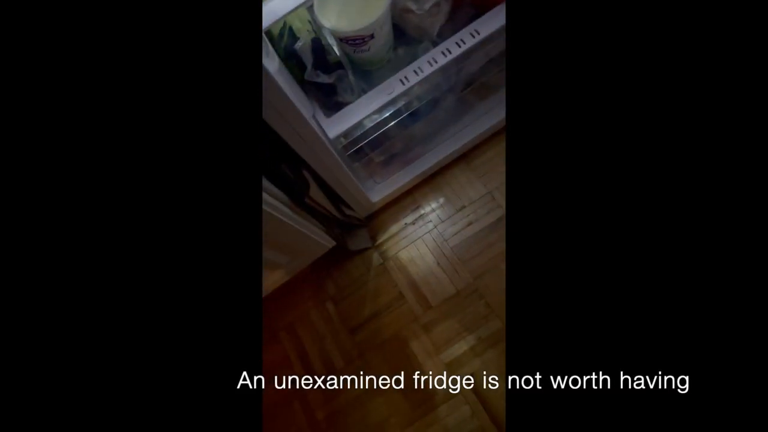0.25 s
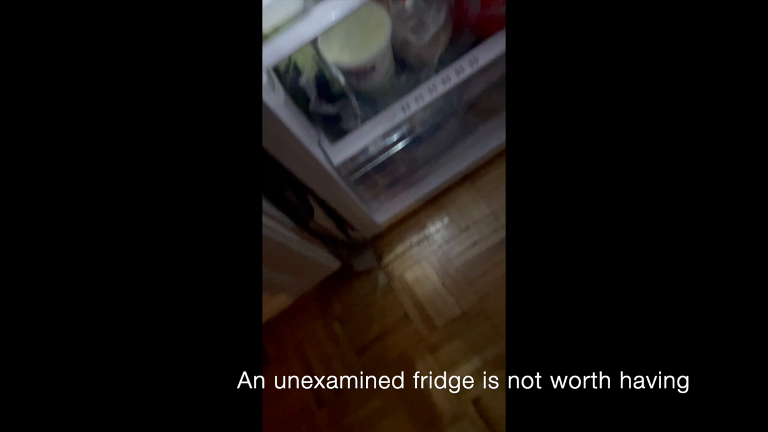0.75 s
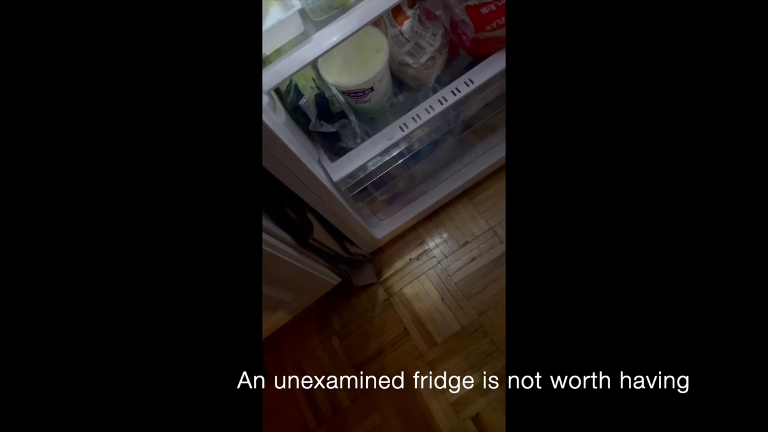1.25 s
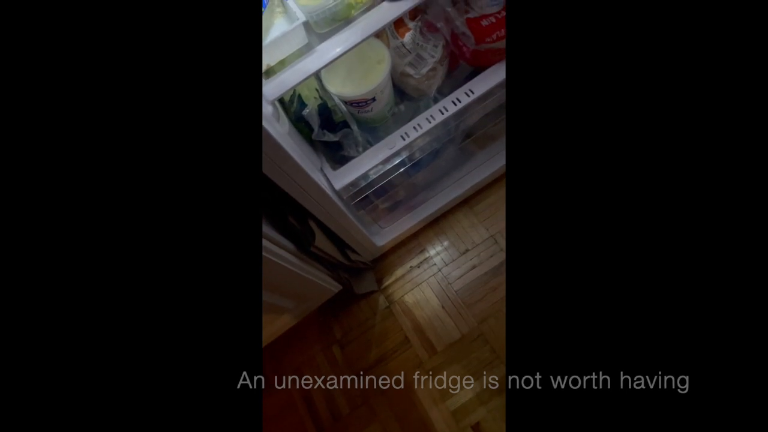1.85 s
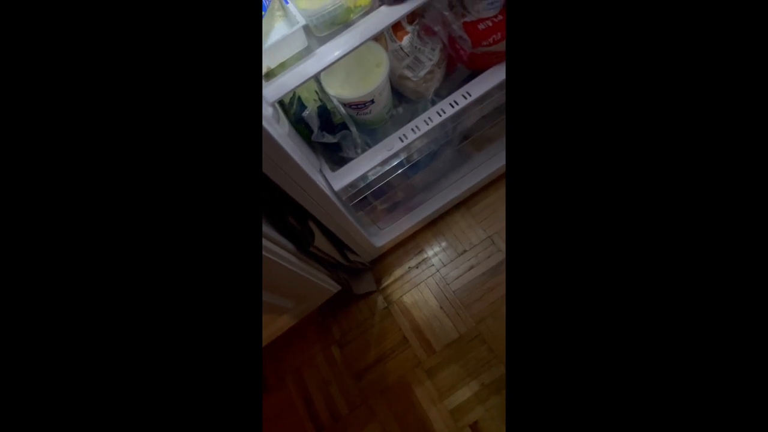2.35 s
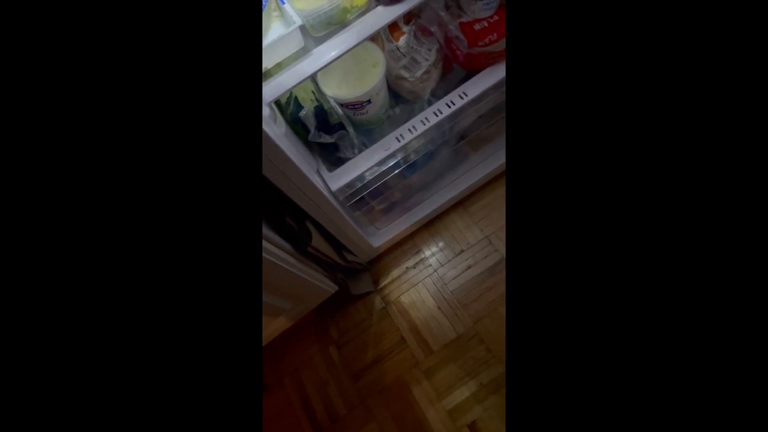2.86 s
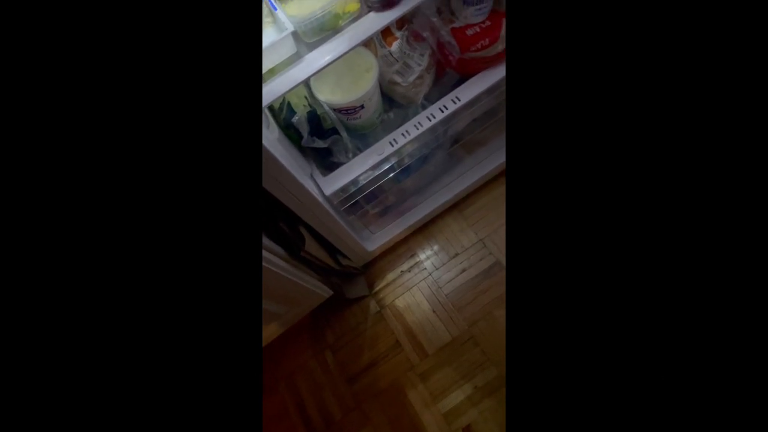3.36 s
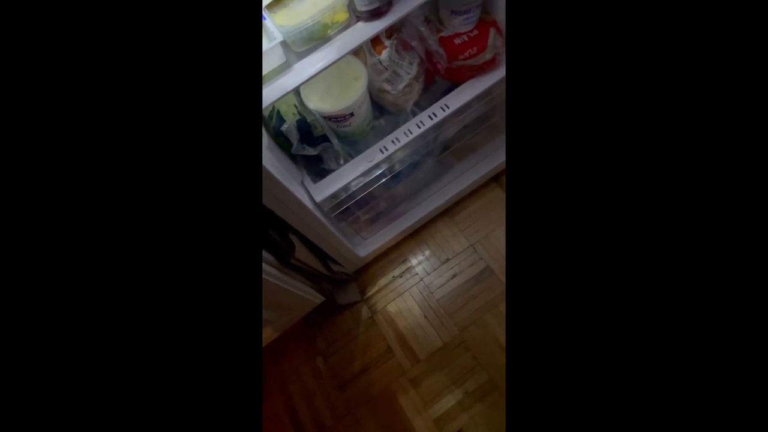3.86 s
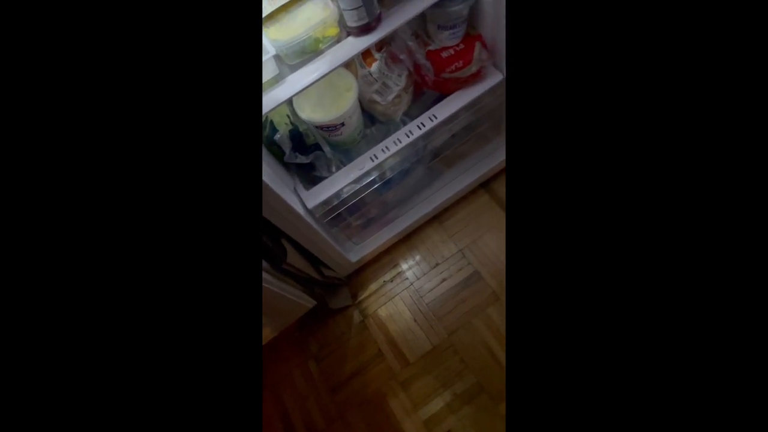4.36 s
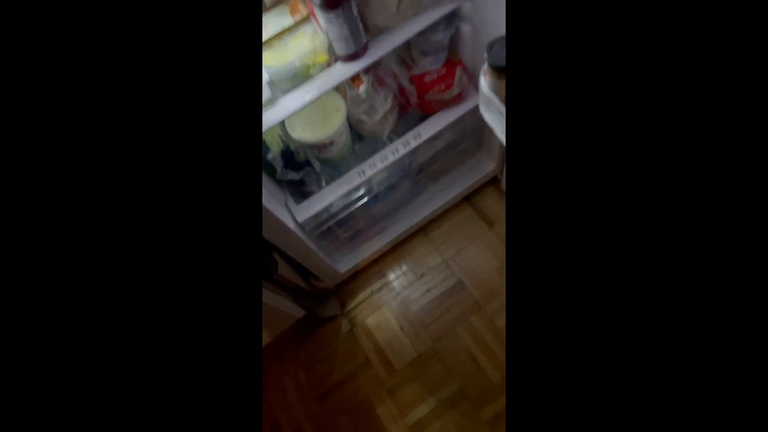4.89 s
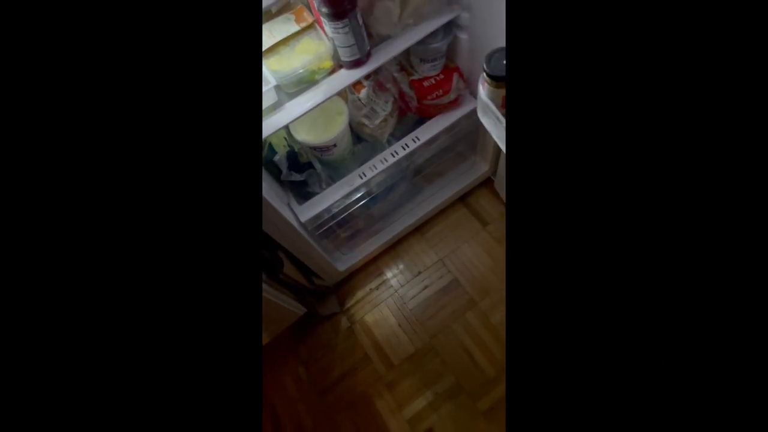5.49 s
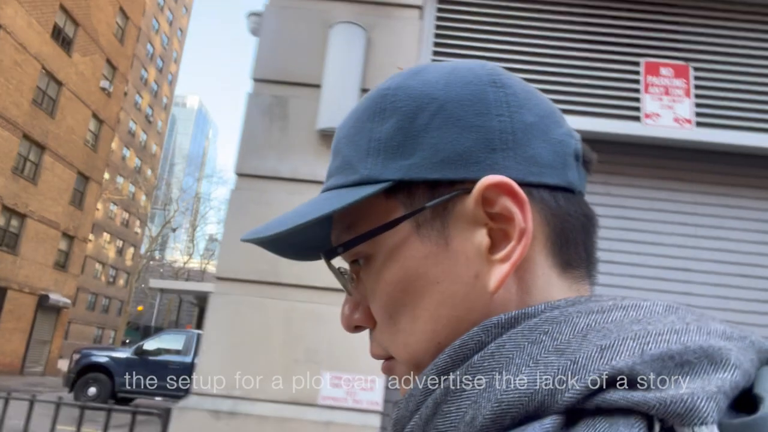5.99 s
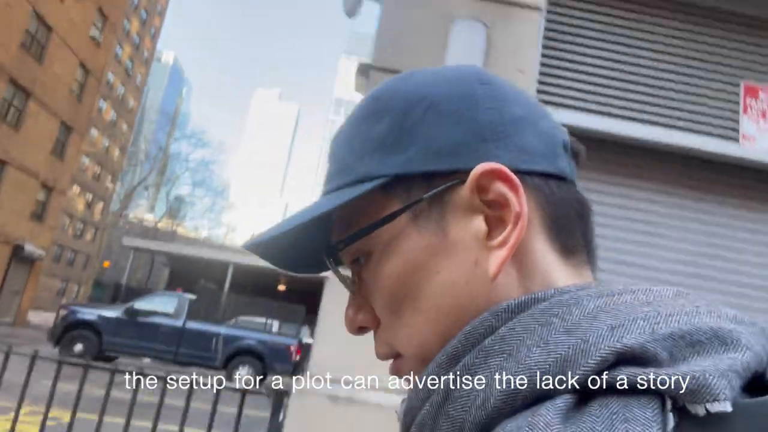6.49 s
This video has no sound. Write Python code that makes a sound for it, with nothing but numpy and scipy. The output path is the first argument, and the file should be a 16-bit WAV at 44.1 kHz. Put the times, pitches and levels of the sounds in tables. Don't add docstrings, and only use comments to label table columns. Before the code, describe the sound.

A refrigerator compressor hums and buzzes in a quiet kitchen, with small plastic ticks, then an abrupt cut to loud wind, traffic and jingling keys.

```python
import sys
import numpy as np
from scipy import signal
from scipy.fft import rfft, irfft, next_fast_len
from scipy.io import wavfile
from scipy.ndimage import uniform_filter1d

SR = 44100
rng = np.random.default_rng(int(sys.argv[2]) if len(sys.argv) > 2 else 0)


def invert_db(level):
    return 10 ** (np.asarray(level, dtype=float) / 20)


def dump_mix(stems):
    frames = np.atleast_2d(stems).T
    limited = np.clip(frames, -1, 1)
    pcm = np.round(limited * 32767).astype(np.int16)
    wavfile.write(sys.argv[1], SR, pcm)


N = 296969
T = np.arange(N) / SR
SHAFT_HZ, FAN_HZ = 59.41, 17.5
CUT_S = 5.855
DOOR_S = 5.65
PORTS = np.array([[1], [-1]])


def curves(table):
    s, *columns = np.transpose(table)
    return [np.interp(T, s, column) for column in columns]


def unit(x):
    return x / np.sqrt(np.mean(np.abs(x) ** 2))


def ring(x, hz, width_hz):
    return signal.lfilter(*signal.iirpeak(min(hz, 0.45 * SR), hz / width_hz, fs=SR), x)


def band(x, low_hz, high_hz):
    return signal.sosfilt(signal.butter(3, [low_hz, high_hz], "bandpass", fs=SR, output="sos"), x)


def steep(x, low_hz, high_hz):
    sos = signal.ellip(6, 0.5, 70, [low_hz, high_hz], "bandpass", fs=SR, output="sos")
    return unit(signal.sosfilt(sos, x))


def coloured(spectrum, channels):
    hz, db = np.transpose(spectrum)
    size = next_fast_len(N)
    bins = np.log(np.fft.rfftfreq(size, 1 / SR) + 1)
    gain = invert_db(np.interp(bins, np.log(hz), db)) * np.sqrt(SR / 2)
    return irfft(rfft(rng.standard_normal((channels, size))) * gain, size)[:, :N]


def walk(rate):
    k = int(SR / rate)
    levels = rng.standard_normal(int(N / SR * 400))[:N // k + 1]
    smooth = uniform_filter1d(uniform_filter1d(np.repeat(levels, k), k), k)
    return 1.2 * smooth[:N]


def panned(x, pan_db):
    return x * invert_db(PORTS / 2 * pan_db)


def burst(s, t60, rise=0.0012):
    out, start = np.zeros(N), int(s * SR) + 1
    age = T[start:start + int(abs(t60) * SR) + 64] - s
    fall = np.exp(-np.log(1000) * age / max(t60, 0.002))
    out[start:start + len(age)] = (1 - np.exp(-age / rise)) * fall
    return out


# pitch_hz, wander_hz, level_db
FAN_TONES = [(103.7, 1.5, -70), (70.1, 3.5, -69), (196.8, 4.03, -71.5), (206.1, 2, -72.5),
             (239.4, 3, -77.5)]
# pitch_hz, level_db_per_hz
FAN_AIR = [(20, -103), (40, -98), (75, -85.5), (145, -90), (200, -84.5), (300, -88), (450, -101),
           (600, -108), (1000, -107.5), (2600, -113), (3000, -125), (5300, -130), (6500, -139),
           (9300, -142), (9800, -150)]


def fans():
    tones = invert_db(-78.5) * np.cos(2 * np.pi * (120 * T - 0.61))
    for hz, wander_hz, db in FAN_TONES:
        tone = unit(np.sin(2 * np.pi * np.cumsum(hz + wander_hz * walk(6)) / SR))
        tones += invert_db(db) * tone * invert_db(0.35 * wander_hz * walk(5.5))
    mid, side = coloured(FAN_AIR, channels=2)
    side = 1.1 * signal.sosfilt(signal.butter(2, 500, "highpass", fs=SR, output="sos"), side)
    return panned(tones + mid, -1.1) + side * PORTS


# middle_s, half_length_s, rumble_db, rustle_db, blur (spread of the compressor lines)
GRIP_SHIFTS = [(0, 0.072, -66, -80.5, 2.8), (0.128, 0.092, -75, -84, 3.3), (0.351, 0.21, -58, -93.5, 2.5),
               (0.55, 0.062, -80, -89, 1.5), (0.675, 0.2, -70, -92.5, 0.83), (1.649, 0.25, -87.5, -100, 3),
               (2.1, .04, -74, -105, 0.27), (4.24, 0.12, -58.5, -105, 1.7), (4.738, 0.054, -67, -105, 0.27),
               (5.082, .06, -79, -105, 0.28), (5.832, 0.47, -64, -85.5, 0.75)]


def grip():
    rumble, rustle, blur = invert_db(-81.5), invert_db(-103), 2.97
    for s, half, rumble_db, rustle_db, more in GRIP_SHIFTS:
        bump = np.exp(-((T - s) / half) ** 2)
        rumble = rumble + invert_db(rumble_db) * bump
        rustle = rustle + invert_db(rustle_db) * bump
        blur = blur + more * bump
    return rumble, rustle, blur


def hand():
    rumble, rustle, _ = grip()
    skin = rng.standard_normal((2, N))
    grains = unit(band(skin, 3300, 4300)) + 0.93 * unit(band(skin, 2800, 3300))
    grains += 0.37 * unit(band(skin, 4300, 8000)) + 3.7 * unit(band(skin, 380, 1100))
    low = invert_db(-3) * rumble * unit(band(rng.standard_normal(N), 28, 83))
    return low + rustle * invert_db(4.2 * walk(200)) * grains


# start_s, peak_db, ring_hz, pan_db, bright_edge_db (against the peak)
PLASTIC_TICKS = [(0.0433, -64, 3750, 0, -24), (0.1007, -64, 3330, 4, -26), (0.1251, -65, 3550, 0, -24),
                 (0.168, -67, 3180, 0, -24), (0.2513, -71, 3780, 0, -20), (0.2892, -67, 3370, 0, -20),
                 (0.3082, -66, 3720, 8, -22), (0.4708, -74, 4540, 0, -20), (0.622, -72, 4510, -1, -20),
                 (0.4883, -70, 5200, 3, -13), (0.506, -62, 4320, 6, -23), (0.5591, -69, 5070, -4, -10),
                 (0.7394, -73, 3460, 8, -15), (1.1394, -64, 2910, -2, -17), (1.2521, -50.5, 3220, -14, -28),
                 (1.5808, -68, 3380, 5, -10), (2.221, -65.5, 3860, -8, -11.5), (2.833, -65, 3360, -8, -10),
                 (3.7022, -63, 3400, 4, -6.5), (4.2927, -62, 3540, -5, -15), (4.361, -68.5, 4620, -5, -3.5),
                 (4.829, -61, 3480, -6, -14), (5.2849, -75, 4670, -15, -7)]


def ticks():
    out, t60 = np.zeros((2, N)), 0.05
    noise = rng.standard_normal((3, N))
    crack = unit(band(band(noise[2], 2900, 7800), 2500, 7800))
    body = unit(ring(ring(noise[1], 800, 200), 820, 500))
    edge = unit(band(noise[1], 5600, 9200))
    for s, db, hz, pan_db, edge_db in PLASTIC_TICKS:
        near = slice(int(s * SR) - 500, int(s * SR) + 8000)
        body_db = -6 - 15.5 * np.log2(hz / 3000)
        rung = unit(ring(ring(noise[0, near], hz, 700), hz, 1200)) + invert_db(body_db) * body[near]
        snap = burst(s, 0.0071, rise=0.00047) + 0.12 * burst(s, 4.4 * t60)
        sharp = (crack + invert_db(edge_db + 7) * edge) * snap
        tick = sharp[near] + rung * burst(s, t60)[near]
        out[:, near] += panned(invert_db(db - 9.5) * tick, pan_db)
    return out


# start_s, peak_db, pitch_hz, t60_s
JAR_PINGS = [(.5066, -63.5, 3000, 0.044), (.5066, -61, 4300, .018), (.5066, -66, 1500, .03),
             (.5066, -82, 6300, .03), (.5593, -68, 5080, .043), (.5593, -76, 6099, 0.042),
             (.575, -82.5, 4520, .5), (1.2526, -55, 3020, 0.038), (1.2528, -62, 3470, .03),
             (1.2528, -64, 4150, .015), (1.2528, -65, 4800, .018), (1.2528, -69, 5600, .015),
             (1.2528, -67, 6500, .02), (1.2528, -66, 875, .045)]


def pings():
    out = np.zeros(N)
    for s, db, hz, t60 in JAR_PINGS:
        out += invert_db(db) * np.sin(2 * np.pi * hz * (T - s)) * burst(s, t60, rise=0.00041)
    return out


# start_s, peak_db, pitch_hz, crack_db, bright_db
SEAL_SNAPS = [
    (5.648, -42.5, 740, -37, -62),
    (5.8439, -32, 754, -39.5, -85),
]


def seal_snaps():
    out = np.zeros((2, N))
    noise = rng.standard_normal((3, N))
    crack = unit(band(noise[1] + 0.95 * noise[:2], 1000, 4400))
    bright = 0.7 * steep(noise[2] + 0.57 * noise[:2], 6500, 13000) + 1.5 * steep(noise[2], 13000, 15600)
    for s, db, hz, crack_db, bright_db in SEAL_SNAPS:
        out += invert_db(db) * np.sin(2 * np.pi * hz * (T - s)) * burst(s, 0.019, rise=0.00063)
        fall = burst(s, 0.0039, rise=0.00024) + 0.024 * burst(s, 0.14)
        out += (invert_db(crack_db) * crack + invert_db(bright_db) * bright) * fall
    return out


# start_s, peak_db, pitch_hz
FOOT_THUDS = [
    (4.1525, -33, 78),
    (4.28, -52, 47),
]


def thuds():
    out = np.zeros(N)
    for s, db, hz in FOOT_THUDS:
        out += invert_db(db + 3) * np.sin(2 * np.pi * hz * (T - s)) * burst(s, 0.076, rise=0.006)
    return out


# pitch_hz, width_hz, level_db, angle_turns
VALVE_REEDS = [(2920, 27, -97, 0.067), (3040, 200, -103, 0.1), (3530, 250, -89.5, 0.92),
               (3580, 620, -92.5, 0.28), (3937, 120, -94, .1), (4620, 250, -94, 0.12),
               (4850, 240, -88, 0.042), (4980, 140, -99, 0.81), (5880, 110, -104, 0.47)]
# time_s, lower_high_ring_share, low_ring_db, middle_ring_db
REED_SHIFT = [(0, 0.2, 6, -1), (.65, 0.84, 7.5, -0.5), (.9, 0.05, 0.5, 0.5), (3.5, 0.06, 0, -0.5),
              (4, 0.8, 0, -0.5), (4.9, 0.8, -0.5, -2), (5.2, 0.82, 3, -4), (5.85, 0.84, 3, -6)]


def reeds():
    out = np.zeros((2, N))
    turn = SHAFT_HZ * T + 0.0015 * walk(50)
    high, low_db, middle_db = curves(REED_SHIFT)
    for hz, width_hz, db, angle in VALVE_REEDS:
        since = (turn - angle) % 1
        size = invert_db(0.8 * rng.standard_normal(500))[(turn - angle + 1).astype(int)]
        gas = np.exp(-since / 0.33) * rng.standard_normal((2, N))
        slap = 13 * (np.diff(since, prepend=0) < 0) + gas
        shift_db = low_db * (3000 < hz < 3200) + middle_db * (3200 < hz < 3560)
        shift_db = shift_db + high * (3.5 * (4300 < hz < 4800) - 1.5 * (4800 <= hz < 5400))
        shift_db = shift_db - 1.0 * (T > DOOR_S)
        out += invert_db(db + shift_db) * unit(ring(ring(slap * size, hz, width_hz), hz, 3 * width_hz))
    return out


TOP_MULTIPLE = 47
# shaft_multiple, left_db, right_db, moved_left_db, moved_right_db
LOW_LINES = [(1, -52.5, -52.0, -53.5, -53.5), (2, -62.5, -62, -64, -62.5), (3, -68.0, -68.5, -69.5, -70),
             (4, -71.5, -71.5, -73.5, -73), (5, -77, -77.5, -76, -75.5), (6, -76.5, -75, -75.5, -71.0),
             (7, -57.5, -54.5, -61, -57.5), (8, -73, -73, -76.5, -73.0), (9, -92.5, -91, -88, -82.0),
             (10, -93.5, -92.5, -94, -89.5), (11, -92.5, -91, -90, -91.5), (12, -84.5, -80.5, -87.5, -84.5),
             (13, -88.5, -80.5, -91, -83), (14, -87, -80.5, -84.0, -77.5), (15, -87, -89.5, -77.0, -78.5),
             (16, -88, -82, -81.5, -79), (17, -86, -80, -94.5, -86.5), (18, -71.5, -64.5, -72, -73),
             (19, -68, -62.5, -62, -60.0), (20, -69, -62.5, -67, -57.5), (21, -67, -72.5, -74, -72.5),
             (22, -67, -67.5, -67, -71), (23, -69.5, -68.0, -71, -70), (24, -81.5, -71, -73, -70.5),
             (25, -81, -77, -76.5, -76)]
# shaft_multiple, left_db, right_db, moved_left_db, moved_right_db
BUZZ_LINES = [(26, -88, -83.5, -83, -84), (27, -87, -84.5, -86, -86), (28, -84, -82, -82, -81.5),
              (29, -79.5, -79.5, -78, -77.5), (30, -79.5, -82.5, -77, -74.5), (31, -77.5, -76, -74.0, -72),
              (32, -80, -86, -83.5, -82.5), (33, -75.5, -80.5, -80, -76), (34, -80.5, -81.5, -82, -78.0),
              (35, -84, -87, -85.5, -81), (36, -82.5, -87.0, -79, -78.5), (37, -95, -94.0, -93.5, -85.5),
              (38, -87, -80, -84, -83), (39, -81.5, -82.5, -87, -79.5), (40, -78.5, -77, -90, -85.5),
              (41, -72.5, -74.5, -78, -78.0), (42, -70.5, -75.5, -80, -77.5), (43, -81, -78.5, -84, -76.5),
              (44, -93.0, -77.5, -74, -76.5), (45, -92.5, -87.5, -89, -85), (46, -98, -91.5, -93, -83.5),
              (47, -100.0, -98.5, -88.5, -88.5)]
PORT_LEADS = [(6, -1.5, 0.7), (7, -0.54, -0.3), (8, 0.9, 0.5), (12, 1.43, 0.8), (13, 1.5, 0.4),
              (14, 1.8, -0.023), (15, 1, 0.5), (16, 0.5, -0.6), (17, -0.9, 2.3), (18, 1.87, 0),
              (19, 0.0, -1.1), (20, 1.5, -0.97), (21, -1.65, 1.1), (22, 0.5, 0.9), (23, 1, 0.7),
              (24, 2.5, 0.67), (25, -1.1, 0.3), (30, 0, 0), (31, -1.2, 0.2), (33, 0, 0), (34, 1, 1),
              (35, -0.5, -0.7), (36, 1, 1), (38, 1, -1.1), (39, -1.5, 1), (40, 1, 2.2), (41, 0.15, 3),
              (42, 0.67, 0.5), (43, 0.1, 0.8), (44, -1.5, 0.9), (45, -1.5, -0.62), (46, 3, 1),
              (47, -2, 1.1)]


def line_levels():
    db, lead = np.zeros((TOP_MULTIPLE + 1, 4)), np.zeros((TOP_MULTIPLE + 1, 2))
    for k, *row in list(LOW_LINES) + list(BUZZ_LINES):
        db[int(round(k))] = row
    for k, *row in PORT_LEADS:
        lead[int(round(k))] = row
    late = np.exp(-2j * np.pi * 0.0043 * np.arange(TOP_MULTIPLE + 1))[:, None]
    half = np.array([0.5j, -0.5j])
    before = invert_db(db[:, :2]) * np.exp(half * lead[:, :1])
    after = invert_db(db[:, 2:]) * np.exp(half * lead[:, 1:]) * late
    return before, after


PARTS = [(1, 0.13, 0.031), (2, 0.75, 0.034), (9, 1, 0.05), (17, 0.21, 0.05), (26, 0.041, 0.046),
         (37, 0.051, 0.04), (43, 0.063, 0.035)]
SLAPS = [(.24, .25, .5), (.439, .438, .5), (.16, .8, .53), (.432, .164, .41), (.182, .43, .28),
         (.278, .478, .47), (.278, .478, .47)]
UNEVEN = [.04, .04, .12, .15, .14, .21, .19]
TWINS = [.02, .03, .1, .07, .08, .1, .1]
# settling_db (while the phone settles), door_db (after the seal lets go)
PART_STEPS = [(3, -5.5), (0.1, -2.5), (1, 1), (-2, 0.2), (-5.5, -1.5), (-6, -1), (7.5, 2.5)]
MOVED = [0.017, 0.027, 0.09, 0.11, 0.24, 0.86, 0.79]


def compressor():
    jitter_rad, rock_rad, scatter = 0.5, 0.79, 0.38
    hold = 32
    out, (before, after), blur = np.zeros((2, N)), line_levels(), grip()[2]
    turn, line = np.exp(2j * np.pi * SHAFT_HZ * T), 1
    fan = np.pi * FAN_HZ * T + 0.54 * walk(3)
    rocking = np.sin(2 * fan) + 0.97 * np.sin(fan)
    stops, moved = np.linspace(0, CUT_S, num=7), np.array(MOVED)
    settling, door = np.exp(-(T / 0.53) ** 2), np.clip((T - DOOR_S) / 0.025, 0, 1)
    ends = [part[0] for part in PARTS[1:]] + [TOP_MULTIPLE + 1]
    groups = zip(PARTS, ends, SLAPS, UNEVEN, TWINS, PART_STEPS)
    for (first, smear, drift), end, (suction, discharge, share), uneven, twin, (settle_db, door_db) in groups:
        lines, rocked = np.zeros((2, N), complex), np.zeros((2, N), complex)
        for k in range(int(round(first)), int(round(end))):
            line = line * turn
            slaps = (1 - share) * np.exp(-2j * np.pi * k * suction)
            slaps += share * np.exp(-2j * np.pi * k * discharge)
            phase = np.exp(1j * (np.angle(slaps) + smear * rng.standard_normal()))
            rock = np.exp(2j * np.pi * rng.random())
            for side in range(2):
                room = 1 + drift * (rng.standard_normal(7) + 1j * rng.standard_normal(7))
                here = before[k, side] + moved * (after[k, side] - before[k, side])
                gain = np.interp(T[::hold], stops, here * phase * room)
                heard = np.repeat(gain, hold)[:N] * line
                lines[side] += heard
                rocked[side] += rock * heard
        grain = scatter * uneven * blur * np.exp(2.5j * walk(35))
        lines = lines * np.exp(1j * uneven * blur * (jitter_rad * walk(60) + rock_rad * rocking))
        twins = twin * rocked * np.exp(-2j * np.pi * FAN_HZ * T)
        level = invert_db(settle_db * settling + door_db * door)
        out += np.sqrt(2) * np.real(lines + twins + grain * rocked) * level
    return out


# time_s, tyres_db, engines_db
TRAFFIC = [(5.86, -59, -46), (5.868, -54, -40), (6.0, -56, -42), (6.1, -57, -40.5), (6.2, -56, -41),
           (6.3, -56.5, -42.5), (6.41, -55.5, -44.5), (6.52, -55.5, -43.5), (6.62, -57.5, -44),
           (6.73, -57, -43.5)]
# pitch_hz, level_db_per_hz
STREET = [(120, -8), (200, 7), (310, -4.5), (402, -9), (461, -8.5), (845, -4), (1140, -10), (1440, -11),
          (6070, -39), (7500, -26.5), (9750, -53), (16500, -120)]
# pitch_hz, shared_share, left_lead_rad
PORT_SHARING = [(191, 0.22, 4.1), (347, 0.57, 1.93), (1400, 0.82, 2.54), (1885, 0.79, 2.9),
                (2026, 0.17, 4.4), (3040, 0.77, 5.6), (3360, 0.17, 7.6), (7200, 0.33, 8.1)]


def traffic():
    shared, left, right = rfft(coloured(STREET, channels=3))
    hz, share, lead = np.transpose(PORT_SHARING)
    bins = np.log(np.fft.rfftfreq(N, 1 / SR) + 1)
    share = np.clip(np.interp(bins, np.log(hz), share), 0, 1)
    lead = np.interp(bins, np.log(hz), lead)
    common = np.sqrt(share) * np.array([shared, shared * np.exp(-1j * lead)])
    noise = irfft(common + np.sqrt(1 - share) * np.array([left, right]), N)
    tyres_db, engines_db = curves(TRAFFIC)
    engines, tyres = unit(band(noise, 253, 1560)), unit(band(noise, 1940, 6000))
    murmur = sum(invert_db(1.33 * walk(18)) * band(engines, low, 1.506 * low)
                 for low in (201.4, 299, 448, 674, 986, 1614))
    roll = sum(invert_db(0.99 * walk(30)) * band(tyres, low, 1.406 * low) for low in (1628, 2406, 3370, 5270))
    return invert_db(engines_db + 5.5 + 1.1 * walk(40)) * murmur + invert_db(tyres_db + 6) * roll


# low_hz, high_hz, level_db
HISS_SUM = [(6140, 8700, -19), (7680, 10000, 0.5), (9870, 10900, -7.5), (13240, 14300, -9.5),
            (14300, 15800, -8)]
# low_hz, high_hz, level_db
HISS_DIFFERENCE = [(6300, 6700, -10), (9600, 11100, -4.5), (11200, 13000, -2), (13000, 14400, -10)]
# start_s, peak_db, high_hz, low_hz, high_ring_db (against the peak)
JINGLES = [(5.8599, -52, 15360, 7800, -12), (5.867, -44, 15300, 7740, -10), (5.881, -35.5, 15400, 9560, -5),
           (5.9496, -41, 15600, 8440, -6), (6.0634, -50, 15100, 8000, -12), (6.2106, -48, 15500, 8770, -10),
           (6.243, -36, 15100, 7500, -14), (6.2564, -28, 15400, 9540, 1), (6.263, -35, 15200, 9100, -4),
           (6.3054, -36, 15500, 8760, -1), (6.3747, -40, 15500, 9000, -6), (6.391, -32.5, 15000, 7700, -16),
           (6.448, -37, 14300, 7400, -12), (6.467, -33.5, 14300, 7200, -14), (6.282, -45, 15200, 8500, -5),
           (6.292, -43, 15400, 8000, -3), (6.332, -42, 15000, 8500, -14)]


def hiss():
    tyres_db, _ = curves(TRAFFIC)
    white = rng.standard_normal((2, N)) * invert_db(tyres_db - 13 + 2 * walk(120))
    wash = rng.standard_normal((2, N))
    for s, db, *_ in JINGLES:
        white += invert_db(db - 22) * wash * burst(s, 0.028)
    scale = np.sqrt(np.mean(white[0] ** 2))
    mid = sum(invert_db(db) * steep(white[0], low, high) for low, high, db in HISS_SUM)
    side = sum(invert_db(db) * steep(white[1], low, high) for low, high, db in HISS_DIFFERENCE)
    return scale * np.array([mid + side, mid - side])


# start_s, length_s, end_db, pitch_hz, left_lead_rad
CHIMES = [
    (6.449, .028, -55, 14300, .9),
    (6.451, .03, -60, 12100, 3.1),
]


def keys():
    out, noise = np.zeros((2, N)), rng.standard_normal(N)
    click = steep(noise, 5200, 11100) + 0.7 * steep(noise, 13200, 15800)
    click = click + 0.6 * PORTS * steep(noise, 11000, 13100)
    for s, db, high_hz, low_hz, high_db in JINGLES:
        out += invert_db(db - 15) * click * burst(s, 0.0074, rise=0.00033)
        rings = invert_db(high_db) * np.sin(2 * np.pi * high_hz * (T - s))
        rings += 0.34 * np.sin(2 * np.pi * low_hz * (T - s))
        rings = rings + invert_db(high_db - 6) * PORTS * np.sin(2 * np.pi * 12200 * (T - s))
        out += invert_db(db - 5) * rings * burst(s, 0.015, rise=0.00074)
    out += invert_db(-54) * steep(rng.standard_normal(N), 10900, 13300) * burst(6.2564, 0.016, rise=0.0004)
    for s, length, db, hz, lead in CHIMES:
        growth_db = -5 * np.clip(1 - (T - s) / length, 0, 1)
        stop_db = -1500 * np.clip(T - s - length, 0, 1)
        swell = np.clip((T - s) / 0.003, 0, 1) * invert_db(growth_db + stop_db + 4.5 * walk(250))
        out += invert_db(db) * swell * np.sin(2 * np.pi * hz * T + lead / 2 * PORTS)
    return out


# middle_s, peak_db, half_length_s, pitch_hz, pan_db
HEAVES = [(5.9, -41, 0.034, 52, -4), (6.059, -38, 0.027, 48, -5), (6.158, -46, .02, 48, -4),
          (6.241, -38, 0.034, 50.3, 0), (6.344, -37, .025, 48.4, 1.5), (6.378, -41, .012, 50, 0),
          (6.424, -47, .02, 52, 0), (6.57, -44, .035, 52.5, 0), (6.645, -47, .03, 50, -3),
          (6.717, -47, .03, 50, -1)]


def heaves():
    out = np.zeros((2, N))
    for s, db, half, hz, pan_db in HEAVES:
        swing = np.cos(2 * np.pi * hz * (T - s) + 0.6 * PORTS)
        out += panned(invert_db(db + 1) * np.exp(-((T - s) / half) ** 2) * swing, pan_db)
    return out


# start_s, peak_db, pitch_hz, pan_db
PUFFS = [(5.866, -27, 259, -4), (5.883, -26.5, 290, -11), (5.986, -25, 372, -7), (5.999, -22, 292, 8),
         (6.021, -18.5, 336, -1.5), (6.114, -31, 288, -3), (6.192, -27, 410, -6), (6.207, -18.5, 404, 1),
         (6.273, -20, 328, -0.5), (6.295, -26.5, 258, 4), (6.328, -28, 266, -1), (6.35, -37, 250, 2),
         (6.374, -34, 730, -4), (6.562, -43, 690, 18), (6.61, -40, 314, -10), (6.688, -38, 390, 1)]


def puffs():
    out = np.zeros((2, N))
    for s, db, hz, pan_db in PUFFS:
        fall = 1 - 3.8 * np.clip(T - s, 0, 0.05)
        phase = 2 * np.pi * hz * (T - s) * fall + np.array([[2.1], [0]])
        out += panned(invert_db(db + 4.5) * np.sin(phase) * burst(s, 0.021, rise=0.00063), pan_db)
    return out


# time_s, level_db, pan_db, eddy_hz
GUSTS = [(5.856, -32.5, 0, 150), (5.935, -35, -3, 139.9), (5.952, -39.5, 0, 110.2),
         (5.978, -32.5, -1.5, 118.3), (6.024, -39, -4, 175.3), (6.05, -43, 0, 90.2),
         (6.104, -36, 1.5, 146.9), (6.14, -41.5, -2, 144.9), (6.2, -42, 0, 105), (6.254, -40, 1.5, 94.8),
         (6.292, -35.5, -5, 134.7), (6.312, -44, 3, 109.7), (6.335, -38, 1, 74.9), (6.4, -49, -2.5, 115),
         (6.436, -41, -1, 95), (6.51, -46.5, -2, 130.3), (6.578, -43, 0, 82.3), (6.73, -48, 1.5, 85.2)]


def wind():
    db, pan_db, hz = curves(GUSTS)
    spin = np.exp(2j * np.pi * np.cumsum(hz + 6 * walk(25)) / SR) * np.exp(0.8j * walk(110))
    eddies = np.array([np.real(spin * np.exp(1j * (lead + 0.69 * walk(70)))) * invert_db(1.4 * walk(60))
                       for lead in (1.4, 0)])
    eddies = unit(band(eddies, 62, 380))
    flutter = unit(np.tanh(0.82 * eddies))
    rumble = unit(band(rng.standard_normal((2, N)) + 0.32 * rng.standard_normal(N), 50, 100))
    return invert_db(db + 3 + np.array([pan_db, -pan_db]) / 2) * flutter + invert_db(-51.5) * rumble


def scene():
    outdoors = np.clip((T - CUT_S) / 0.0021, 0, 1)
    handling = hand() + ticks() + pings() + seal_snaps() + thuds()
    kitchen = fans() + handling + reeds() + compressor()
    street = traffic() + hiss() + keys() + heaves() + puffs() + wind()
    return kitchen * (1 - outdoors) + street * outdoors


def band_limit(x):
    return signal.sosfilt(signal.butter(12, 16800, fs=SR, output="sos"), x)


def record(dry):
    top_cut = signal.ellip(8, 0.2, 70, 15900, fs=SR, output="sos")
    return band_limit(signal.sosfilt(top_cut, dry))


dry = scene()
out = record(dry)
dump_mix(out)
```